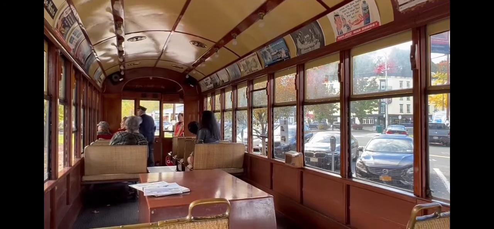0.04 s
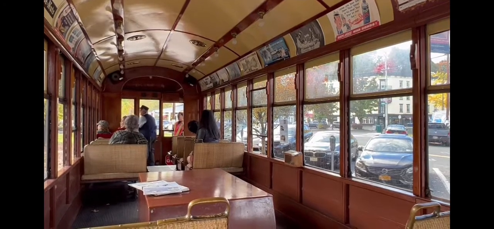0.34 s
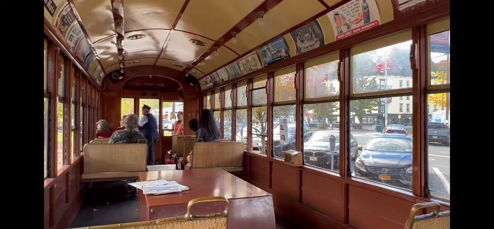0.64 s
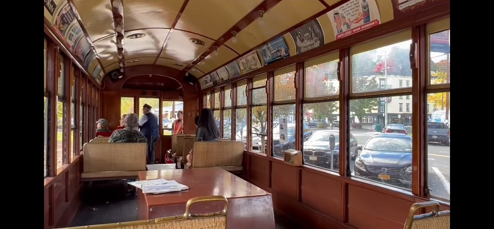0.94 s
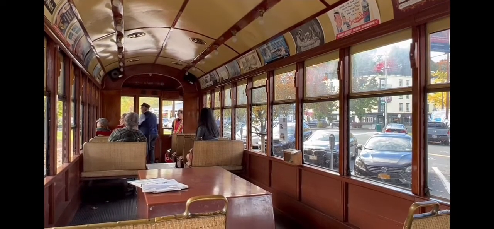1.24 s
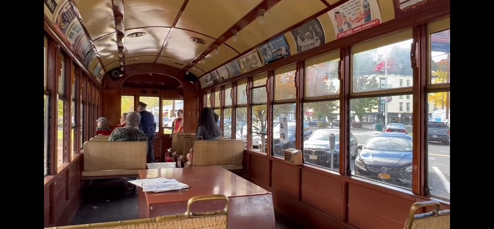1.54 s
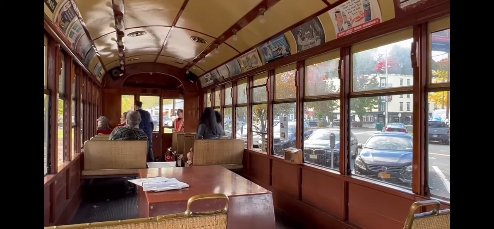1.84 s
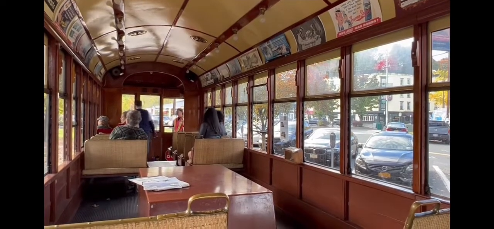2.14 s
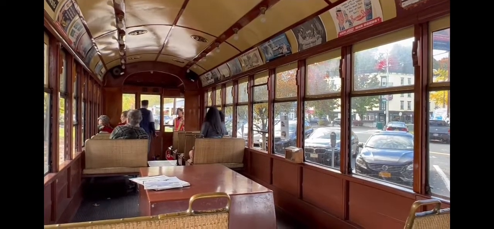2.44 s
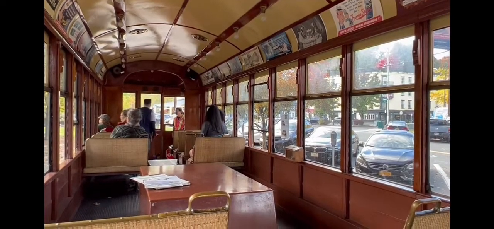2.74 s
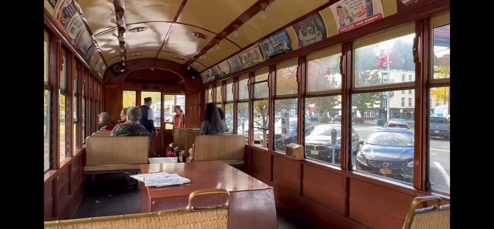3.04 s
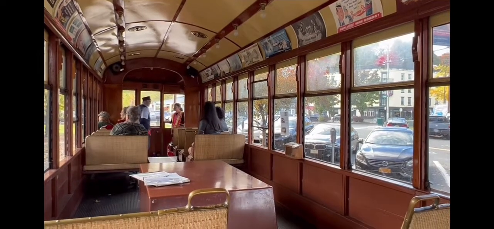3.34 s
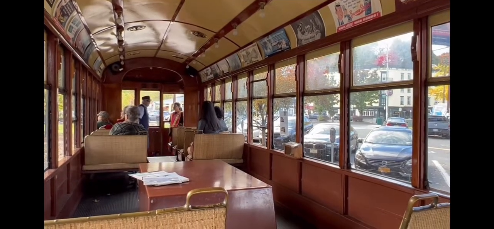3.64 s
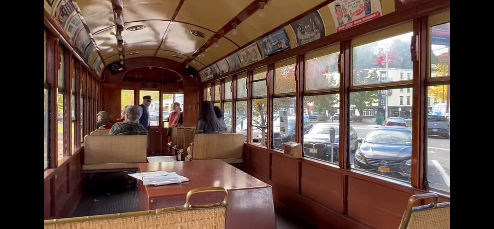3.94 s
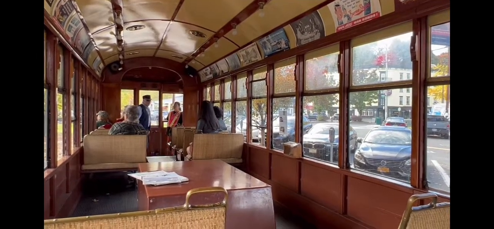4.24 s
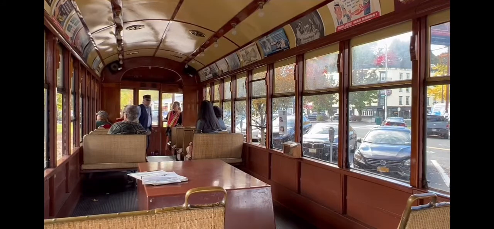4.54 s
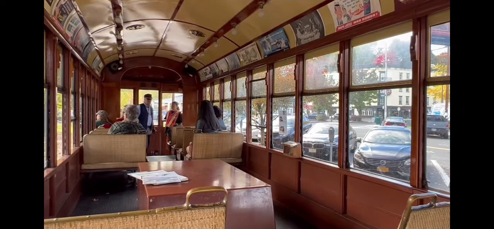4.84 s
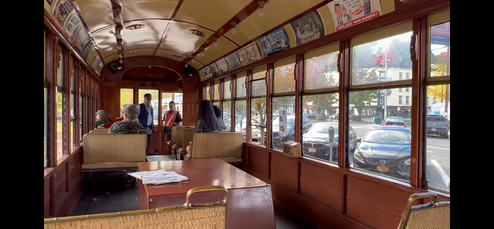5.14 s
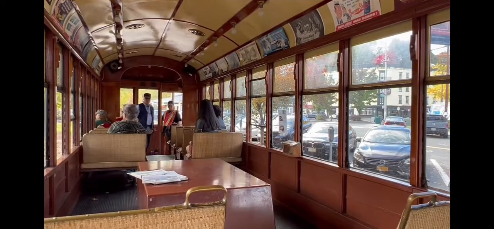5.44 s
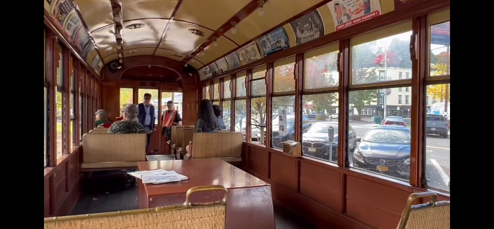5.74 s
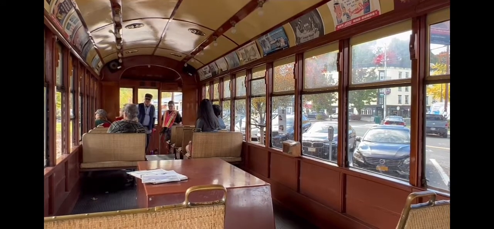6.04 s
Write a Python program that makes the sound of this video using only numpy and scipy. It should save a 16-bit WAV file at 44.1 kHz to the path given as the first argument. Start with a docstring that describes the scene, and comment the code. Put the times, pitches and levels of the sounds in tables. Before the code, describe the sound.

Steady, throbbing engine drone inside a stationary wooden trolley car, with rushing air and faint rattles and ticks.

```python
"""Wooden trolley car, standing, engine running.

Four-cylinder firings drone through the body. A belt-driven machine, probably a pump, hums just under
five times the cycle rate and beats with them. Clatter repeats each cycle, a panel clanks, a gear sings,
a metal fitting rattles and squeaks, a loose part ticks in limping pairs, and cooling air rushes."""
import sys
import numpy as np
from scipy.fft import rfft, irfft, next_fast_len
from scipy.io import wavfile
from scipy.ndimage import map_coordinates

SR = 44100
rng = np.random.default_rng(int(sys.argv[2]) if len(sys.argv) > 2 else 0)


def log_audio(samples):
    """Write samples as a 16-bit WAV file to the path given in sys.argv[1]."""
    # one column per channel
    frames = np.atleast_2d(samples).T
    # limit to full scale, then quantise
    limited = np.clip(frames, -1, 1)
    pcm = np.round(limited * 32767).astype(np.int16)
    wavfile.write(sys.argv[1], SR, pcm)


N = 268569

CYLINDERS, PUMP_STROKES_PER_CYCLE = 4, 4.9743  # cycle = two crank turns
SHAKE_DELAY_FIRINGS = 0.78
TOP_HZ = 15800

# Crankshaft speed: time_s, speed_rpm
CRANK_SPEED = [(0, 1247.6), (2.5, 1247.8), (3.2, 1244.6), (6.09, 1242)]
# Firing drone: firing_harmonic, level_db
FIRING_HARMONICS = [(1, -20), (2, -25), (3, -25.5), (4, -33.5), (5, -48.5), (6, -41.5), (7, -51.5),
                    (8, -46.5), (9, -46.5), (10, -51.5)]
# Pump hum: stroke_harmonic, level_db
PUMP_HARMONICS = [(1, -29.5), (2, -29), (3, -25.5), (4, -37.5), (5, -32.5), (6, -35.5), (7, -47), (8, -45),
                  (10, -40)]
# Lines from unequal cylinders: cycle_harmonic, level_db
LOPE_HARMONICS = [(6, -48), (7, -36), (9, -46), (11, -46), (13, -47), (14, -50), (15, -36), (17, -46),
                  (18, -41), (19, -48), (21, -49), (22, -46), (23, -44), (26, -44.5), (27, -43.5),
                  (28, -46.5), (29, -44), (31, -44), (32, -43.5), (38, -46.5)]
# Driven parts, probably gears and fan blades: cycle_harmonic, level_db
WHINE_HARMONICS = [(52, -47.5), (72, -47.5), (85, -52), (106, -49.5), (109, -54.5), (125, -53.5),
                   (148, -52.5)]
# Clatter through the body: freq_hz, relative_density_db
CLATTER_SPECTRUM = [(60, -32), (130, -6), (280, -4.5), (450, -6), (680, -1.5), (930, -14.5), (1130, -5.5),
                    (1380, -19.5), (1560, -13), (2100, -13.5), (2500, -21), (3400, -22), (6000, -50.5)]
# Engine cover ring: freq_hz, width_hz, relative_db
COVER_MODES = [(1573, 13, 1.5), (1697, 27, -2), (2010, 22, -1), (2160, 25, 3.5), (2215, 22, 1),
               (3180, 30, -8), (3335, 35, -4), (4150, 30, -10)]
# Panel knocks: place_cycles, first_relative_db, last_relative_db
PANEL_KNOCKS = [(.07, -1, -8), (.31, -2.5, -7), (.485, -6, -6.5), (.645, -4.5, 4)]
# Panel ring: freq_hz, width_hz, relative_db
PANEL_MODES = [(1103, 48, 5), (1147, 52, -9), (1270, 50, -9), (1550, 45, -9)]
# Gear tone: time_s, pitch_hz, level_db
GEAR_TONE = [(0, 1097, -56), (3.5, 1104, -54), (4.1, 1113, -48), (5.1, 1126, -45.5), (6.09, 1127, -47.5)]
# Fitting's main ring: freq_hz, width_hz, relative_db
FITTING_MAIN_MODES = [(3474, 70, -5), (4510, 25, 3), (4534, 27, 9), (4600, 25, 4.5), (5285, 33, 1)]
# Fitting's upper ring: freq_hz, width_hz, relative_db
FITTING_UPPER_MODES = [(4660, 37, 1), (4540, 35, -12), (4743, 21, 13), (4825, 32, -1), (4790, 36, 2)]
# Rattle strength: time_s, main_relative_db, upper_relative_db
RATTLE_LEVELS = [(0, -47, -52), (.65, -46.5, -54), (1.1, -49.5, -55), (1.55, -49, -52), (2.2, -46, -54),
                 (2.5, -45.5, -56), (2.9, -48.5, -52), (3.9, -47.5, -50.5), (4.35, -48, -54.5),
                 (5.4, -49.5, -49.5), (6.09, -46.5, -51)]
# Shake of the fitting, per cylinder: relative_db
CYLINDER_SHAKE_DB = [-1.5, 1, 1, 1]
# Fitting squeaks: centre_s, sigma_s, level_db
SQUEAKS = [(.305, .012, -53), (1.84, .015, -54), (2.03, .01, -49), (2.81, .011, -48), (3.185, .014, -49),
           (3.775, .014, -51), (4.322, .008, -52), (5.01, .015, -52), (5.817, 0.0082, -52)]
# Loose part's taps: start_s, relative_db
TAPS = [(0.0273, -38), (0.0762, -35), (0.2688, -38), (0.3631, -39), (0.413, -38), (0.6055, -38),
        (0.7497, -37), (0.841, -42), (0.8924, -41), (0.9423, -36), (1.1353, -39), (1.1792, -41),
        (1.3269, -40), (1.4701, -38), (1.6142, -41), (1.6631, -37), (1.8073, -37), (1.8991, -39),
        (1.951, -41), (1.9999, -40), (2.1425, -39), (2.1929, -36), (2.3346, -39), (2.5277, -40),
        (2.577, -39), (2.6204, -45), (2.7691, -39), (2.9128, -37), (2.9622, -39), (3.1557, -32),
        (3.245, -37), (3.3483, -37), (3.5409, -39), (3.6835, -39), (3.7334, -36), (3.7788, -42),
        (3.927, -36), (4.0711, -42), (4.12, -36), (4.1639, -40), (4.263, -40), (4.3126, -36), (4.356, -38),
        (4.4563, -34), (4.5037, -43), (4.6004, -39), (4.6488, -39), (4.7443, -38), (4.794, -37),
        (4.9387, -36), (4.9886, -37), (5.131, -37), (5.1811, -37), (5.3248, -38), (5.3737, -40),
        (5.5677, -36), (5.7119, -42), (5.7618, -33), (5.9549, -38), (6.0442, -41)]
# Loose part's ring: freq_hz, relative_db, t60_s
LOOSE_MODES = [(6900, -10, 0.05), (7700, -4.5, 0.034), (7890, 1, 0.016), (8300, -12, 0.07)]
# Soft scrape: centre_s, sigma_s, level_db
SCRAPE_SWELL = [(5.522, 0.024, -42)]
# Scrape noise: freq_hz, relative_density_db
SCRAPE_SPECTRUM = [(4000, -30), (6300, -7), (7500, 4), (8500, -2), (11000, -30), (16000, -35)]
# Cooling air and body rumble: freq_hz, relative_density_db
AIR_SPECTRUM = [(20, -25), (45, -10.5), (85, 1), (125, -9), (280, -10), (450, -10), (900, -14.5),
                (1150, -13.5), (2000, -23.5), (2500, -29), (3400, -29), (4200, -39), (8000, -87)]
# High hiss with a deep gap near 10 kHz: freq_hz, relative_density_db
HISS_SPECTRUM = [(2000, -17), (3800, 2.5), (4800, 9.5), (5700, 7), (6700, 0.5), (7200, 1), (7900, 2),
                 (9200, 1), (10200, -48), (15800, -7)]
# Running-gear whistles: freq_hz, width_hz, relative_db
WHISTLE_MODES = [(6030, 23, -6.5), (6250, 22, -0.5), (6670, 38, 2), (8080, 28, 0.5), (8430, 33, -2.5),
                 (9100, 22, -3), (9330, 20, -1)]
# Sizzle above the hiss: freq_hz, relative_density_db
SIZZLE_SPECTRUM = [(5000, -18), (10600, -42), (11300, 4.5), (12000, 2), (13000, -6), (15800, -18)]
# Cabin stereo width: freq_hz, side_minus_mid_db
CABIN_WIDTH = [(40, -56), (90, -12), (170, -2.5), (350, -3.5), (700, 0), (1400, 1.5), (6000, -1.5),
               (9000, -1.5), (12000, 1.5)]


def firing_drone(cycle):
    """Firing pulses drone through the body."""
    harmonics = [(CYLINDERS * round(k), db) for k, db in FIRING_HARMONICS]
    return hum(cycle + 0.035, harmonics, waver_db=0.19, jitter_turns=0.00066, lead_rad=18.3,
               lag_rad=0.02461)


def pump(cycle):
    """Pump strokes hum; the fundamental beats with the firings near 10 Hz."""
    strokes = PUMP_STROKES_PER_CYCLE * cycle + 0.057
    tone = hum(strokes, PUMP_HARMONICS, waver_db=0.29, jitter_turns=0.0038, lead_rad=11.7, lag_rad=0.42)
    return tone * pan(left_db=-3)


def lope(cycle):
    """Unequal cylinders add weak lines that beat slowly with the pump."""
    return hum(cycle + 0.481, LOPE_HARMONICS, waver_db=0.35, jitter_turns=0.0004, lead_rad=-11,
               lag_rad=0.0465)


def whine(cycle):
    """Gears and fan blades sing at high cycle harmonics, blurred by play in the drive."""
    return hum(cycle, WHINE_HARMONICS, waver_db=0.34, jitter_turns=0.0019, lead_rad=0, lag_rad=0)


def clatter(cycle, level_db, uneven_db):
    """Pistons, valves and gears knock through the body."""
    gain = amp(level_db + uneven_db * wobble(40))
    return gain * cabin(knocks(cycle, jitter_cycles=0.00075), CLATTER_SPECTRUM)


def covers(cycle, level_db):
    """Engine knocks ring the thin covers."""
    return amp(level_db) * ringing(knocks(cycle, jitter_cycles=0.0007), COVER_MODES)


def panel(cycle, level_db, scatter_cycles):
    """A panel clanks at set places in each cycle; one knock grows, the others fade."""
    place, first_db, last_db = np.transpose(PANEL_KNOCKS)
    index = np.arange(int(cycle[-1]) + 1)[:, None]
    knock_db = first_db + (last_db - first_db) * index / len(index)
    offsets = scatter_cycles * rng.standard_normal((2, *knock_db.shape))
    hits = np.array([blows(cycle, index + place + offset, knock_db) for offset in offsets])
    ring = filtered(hits, lambda hz: resonances(PANEL_MODES, hz) * blunt(hz, soft_hz=1750))
    return amp(level_db) * unit(ring)


def gear(pulse_hz, pulse_db, blur_turns):
    """A gear sings in quick pulses, growing louder and slightly higher."""
    pitch_hz, level_db = curves(GEAR_TONE)
    swell_db = pulse_db * np.cos(2 * np.pi * (pulse_hz * np.arange(N) / SR + 0.04 * wobble(2.8)))
    turns = np.array([np.cumsum(pitch_hz) / SR + blur_turns * wobble(45) for ear in range(2)])
    return amp(level_db) * unit(amp(swell_db) * np.sin(2 * np.pi * turns))


def fitting(cycle):
    """A metal fitting on the left chatters; its two mode groups swell separately."""
    main_db, upper_db = curves(RATTLE_LEVELS)
    main = rattle(cycle, FITTING_MAIN_MODES, main_db - 2.7, uneven_db=1.5, noise_db=-10, early_firings=0)
    upper = rattle(cycle, FITTING_UPPER_MODES, upper_db, uneven_db=2.5, noise_db=-3, early_firings=0.0396)
    return main + upper + amp(main_db - 7.5) * sing(cycle, pitch_hz=4540, throb_db=6, blur_turns=0.15)


def rattle(cycle, modes, level_db, uneven_db, noise_db, early_firings):
    """Each firing throws the fitting against its seat to bounce and ring; the pump helps or hinders."""
    gap_firings, scatter_firings, bounce_loss_db = 0.12, 0.015, 0.5
    pump_swell_db, pump_shift_firings = 2.5, 0.06
    firing = np.arange(int(CYLINDERS * cycle[-1]) + 1)[:, None]
    bounce = np.arange(4)
    due = firing + SHAKE_DELAY_FIRINGS
    pump_rad = 2 * np.pi * (2 * PUMP_STROKES_PER_CYCLE * due / CYLINDERS - 0.047)  # twice a stroke
    shake_db = np.take(CYLINDER_SHAKE_DB, firing % CYLINDERS) + pump_swell_db * np.cos(pump_rad)
    thrown = due - early_firings - pump_shift_firings * np.sin(pump_rad)
    contacts = []
    for late, force in rng.standard_normal((2, 2, len(firing), len(bounce))):
        place = (thrown + gap_firings * bounce + scatter_firings * (1 + bounce) * late) / CYLINDERS
        contacts.append(blows(cycle, place, shake_db - bounce_loss_db * bounce + uneven_db * force))
    drive = np.array(contacts) + amp(noise_db) * noise()
    near, far = filtered(drive, lambda hz: resonances(modes, hz) * blunt(hz, soft_hz=6800))
    return amp(level_db) * np.array([unit(near), unit(near + far)]) * pan(left_db=10.5)


def sing(cycle, pitch_hz, throb_db, blur_turns):
    """The fitting's main mode rings on, topped up by each firing."""
    firing_rad = 2 * np.pi * (CYLINDERS * cycle - SHAKE_DELAY_FIRINGS - 0.2)
    turns = pitch_hz * np.arange(N) / SR + blur_turns * wobble(25)
    tone = np.sin(2 * np.pi * turns + 0.35 * np.sin(firing_rad))
    swell_db = throb_db * np.cos(firing_rad) + 1.4 * wobble(30)
    return unit(amp(swell_db) * tone) * pan(left_db=12)


def squeaks(pitch_hz, rough_turns):
    """The fitting rubs now and then: short, slightly rough tones."""
    turns = pitch_hz * np.arange(N) / SR + rough_turns * wobble(150)
    return swells(SQUEAKS) * np.sqrt(2) * np.sin(2 * np.pi * turns) * pan(left_db=12)


def ticks(gain_db, snap_gain, snap_t60_s, attack_s, soft_hz):
    """A loose part on the right taps in limping pairs; mode strengths vary per tap."""
    t = np.arange(SR // 12) / SR
    mode_hz, mode_db, t60_s = np.transpose(LOOSE_MODES)[:, :, None]
    attack = 1 - np.exp(-t / attack_s)
    out = np.zeros(N + len(t))
    for start_s, tap_db in TAPS:
        decay = amp(mode_db + 1.2 * rng.standard_normal(mode_hz.shape) - 60 * t / t60_s)
        ring = np.sum(decay * np.sin(2 * np.pi * (mode_hz * t + rng.random(mode_hz.shape))), axis=0)
        snap = snap_gain * amp(-60 * t / snap_t60_s) * rng.standard_normal(len(t))
        out[round(start_s * SR):][:len(t)] += amp(gain_db + tap_db) * (ring + snap) * attack
    light_contact = lambda hz: 1 / np.sqrt(1 + (hz / soft_hz) ** 8)
    return filtered(out[:N], light_contact) * pan(left_db=-9)


def jingle(cycle, level_db, throb_db, uneven_db):
    """The loose part also jingles softly, twice a cycle."""
    modes = [(hz, 3 * np.log(10) / (np.pi * t60_s), db) for hz, db, t60_s in LOOSE_MODES]
    swell_db = throb_db * np.cos(4 * np.pi * (cycle - 0.32)) + uneven_db * wobble(90)
    return amp(level_db + swell_db) * ringing(rng.standard_normal(N), modes) * pan(left_db=-9)


def scrape():
    """Something slides briefly in the car."""
    return swells(SCRAPE_SWELL) * cabin(noise(), SCRAPE_SPECTRUM)


def cooling_air(level_db):
    """Cooling air rushes evenly over the body's rumble."""
    gain = amp(level_db + 0.12 * wobble(3.3) + 0.43 * wobble(40))
    return gain * cabin(noise(), AIR_SPECTRUM) * pan(left_db=0.1)


def running_gear(cycle, hiss_db, whistle_db, throb_db, flutter_db):
    """Running gear hisses and whistles faintly, fluttering, with a slight swell each cycle."""
    throb = throb_db * np.cos(2 * np.pi * (cycle + 0.055))
    swell_db = throb + flutter_db * wobble(60) + 0.33 * wobble(6.3)
    hiss = amp(hiss_db) * cabin(noise(), HISS_SPECTRUM) * pan(left_db=3)
    whistle = amp(whistle_db) * ringing(noise(), WHISTLE_MODES)
    return amp(swell_db) * (hiss + whistle)


def sizzle(cycle, level_db, throb_db, uneven_db):
    """A fine sizzle puffs unevenly, once a cycle."""
    swell_db = throb_db * np.cos(2 * np.pi * (cycle - 0.96)) + uneven_db * wobble(16)
    return amp(level_db + swell_db) * cabin(noise(), SIZZLE_SPECTRUM)


def cabin(pair, spectrum):
    """Two unrelated signals to a coloured stereo field, rms 1: bass centred, treble diffuse."""
    def mid_side(hz):
        angle = np.arctan(amp(along(CABIN_WIDTH, hz)))
        return amp(along(spectrum, hz)) * np.array([np.cos(angle), np.sin(angle)])
    mid, side = filtered(pair, mid_side)
    return unit(np.array([mid + side, mid - side]))


def hum(turns, harmonics, waver_db, jitter_turns, lead_rad, lag_rad):
    """Harmonics of a repeating push; the body shifts the lowest and delays the highest."""
    turns = turns + jitter_turns * wobble(14)
    out = np.zeros(N)
    for k, db in harmonics:
        gain = amp(db + waver_db * np.sqrt(k) * wobble(12))
        out += gain * np.cos(2 * np.pi * round(k) * turns + lead_rad / k - lag_rad * k * k)
    return np.sqrt(2) * out


def knocks(cycle, jitter_cycles):
    """Two dense runs of tiny knocks, repeated each cycle with jitter, rms 1."""
    size = int(N / (cycle[-1] - cycle[0]))
    place = (cycle + jitter_cycles * wobble(40)) * size
    runs = irfft(np.exp(2j * np.pi * rng.random((2, size // 2 + 1))), size)
    return unit(np.array([np.interp(place, np.arange(size), run, period=size) for run in runs]))


def blows(cycle, place_cycles, relative_db):
    """Impulses at given places in the engine's run, rms 1."""
    samples = np.searchsorted(cycle, place_cycles.ravel())
    return unit(np.bincount(samples, amp(relative_db).ravel(), N + 1)[:N])


def blunt(hz, soft_hz):
    """Low-pass response of a blunt contact."""
    return 1 / (1 + (hz / soft_hz) ** 6)


def resonances(modes, hz):
    """Response of (freq_hz, width_hz, gain_db) modes."""
    return sum(amp(db) * 1j * hz * width / (freq * freq - hz * hz + 1j * hz * width)
               for freq, width, db in modes)


def ringing(drive, modes):
    """Driven modes, rms 1."""
    return unit(filtered(drive, lambda hz: resonances(modes, hz)))


def swells(rows):
    """Gaussian envelopes, summed."""
    t = np.arange(N) / SR
    return sum(amp(db) * np.exp(-0.5 * ((t - centre_s) / sigma_s) ** 2) for centre_s, sigma_s, db in rows)


def curves(rows):
    """Per-sample values of each column after time_s."""
    time_s, *columns = np.transpose(rows)
    return [np.interp(np.arange(N) / SR, time_s, column) for column in columns]


def along(points, hz):
    """(freq_hz, value) points read on a log axis."""
    freq_hz, values = np.transpose(points)
    return np.interp(np.log(hz + 1), np.log(freq_hz + 1), values)


def filtered(x, response):
    """Apply a frequency response."""
    size = next_fast_len(N + 8192)
    return irfft(rfft(x, size) * response(np.fft.rfftfreq(size, 1 / SR)), size)[..., :N]


def wobble(knot_hz):
    """Smooth random curve."""
    knots = rng.standard_normal(int(N * knot_hz / SR) + 4)
    return map_coordinates(knots, [np.arange(N) * knot_hz / SR])


def noise():
    """Two unrelated white noises."""
    return rng.standard_normal((2, N))


def pan(left_db):
    """Channel gains for a left-minus-right level."""
    return amp([[left_db / 2], [-left_db / 2]])


def amp(db):
    """Decibels to gain."""
    return 10 ** (np.asarray(db) / 20)


def unit(x):
    """Scale to rms 1."""
    return x / np.sqrt(np.mean(x ** 2) + 1e-20)


def scene():
    """Engine, shaken parts and air; the crank speed sags very slightly."""
    speed_rpm, = curves(CRANK_SPEED)
    cycle = 0.015 + np.cumsum(speed_rpm) / 120 / SR  # cycles elapsed
    engine = firing_drone(cycle) + pump(cycle) + lope(cycle) + whine(cycle)
    engine += clatter(cycle, level_db=-33.5, uneven_db=1.53)
    air = cooling_air(level_db=-27.5)
    air += running_gear(cycle, hiss_db=-44, whistle_db=-49.5, throb_db=0.27, flutter_db=1.34)
    air += sizzle(cycle, level_db=-57, throb_db=2, uneven_db=1.5)
    parts = fitting(cycle) + squeaks(pitch_hz=5310, rough_turns=0.15)
    parts += ticks(gain_db=0.4, snap_gain=0.18, snap_t60_s=0.037, attack_s=0.00038, soft_hz=9300)
    parts += covers(cycle, level_db=-48)
    parts += jingle(cycle, level_db=-60.5, throb_db=3.5, uneven_db=2)
    parts += gear(pulse_hz=8.2, pulse_db=4, blur_turns=0.14)
    parts += panel(cycle, level_db=-44, scatter_cycles=0.0019)
    return engine + parts + scrape() + air


def record(dry):
    """Cut everything above TOP_HZ."""
    return filtered(dry, lambda hz: hz < TOP_HZ)


dry = scene()
out = record(dry)
log_audio(out)
```